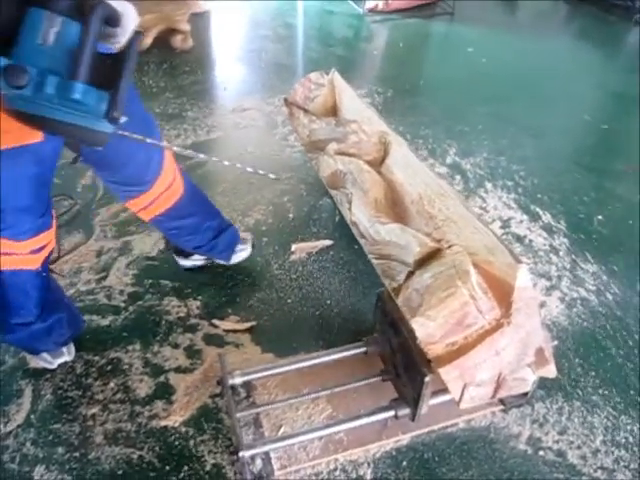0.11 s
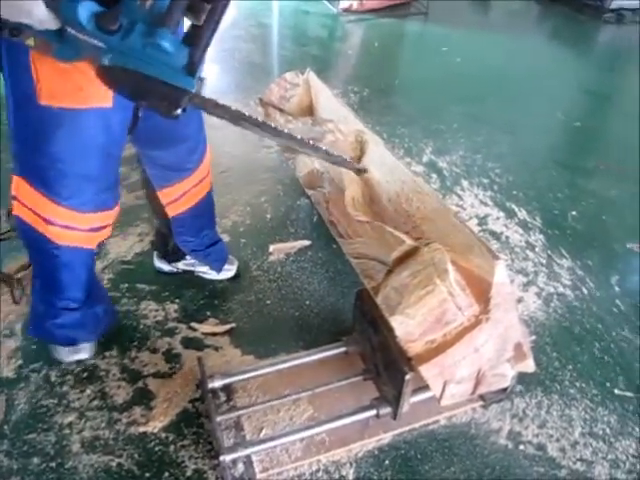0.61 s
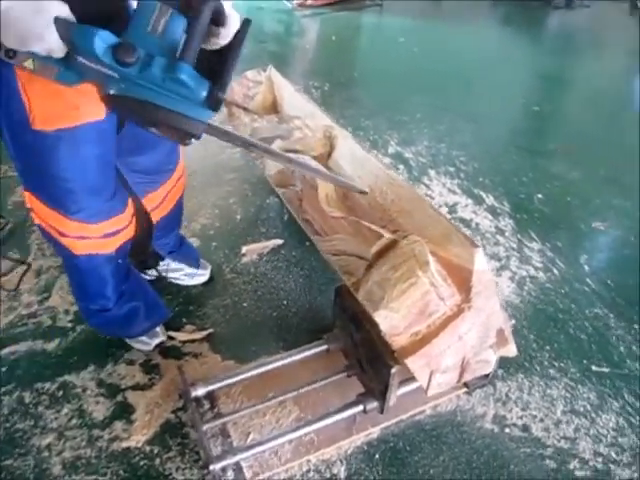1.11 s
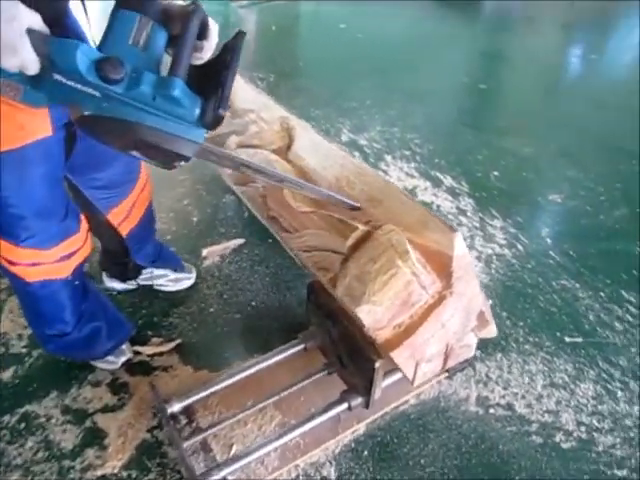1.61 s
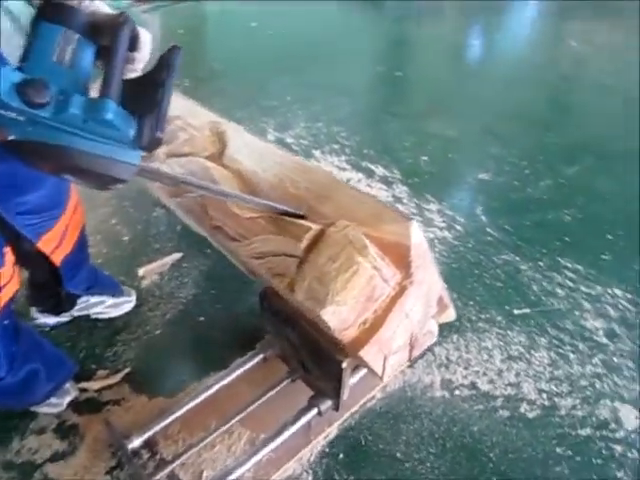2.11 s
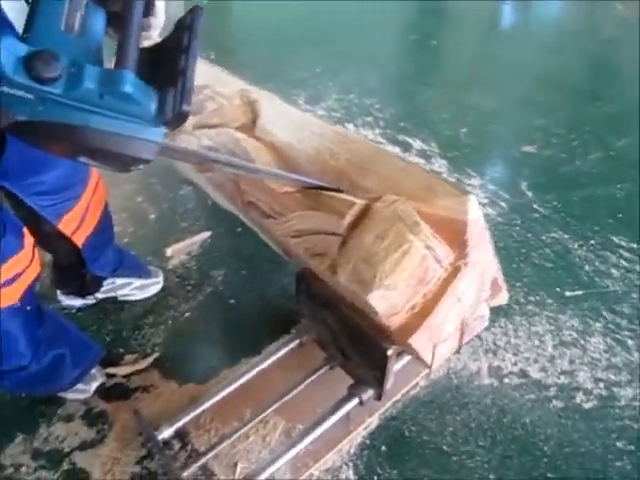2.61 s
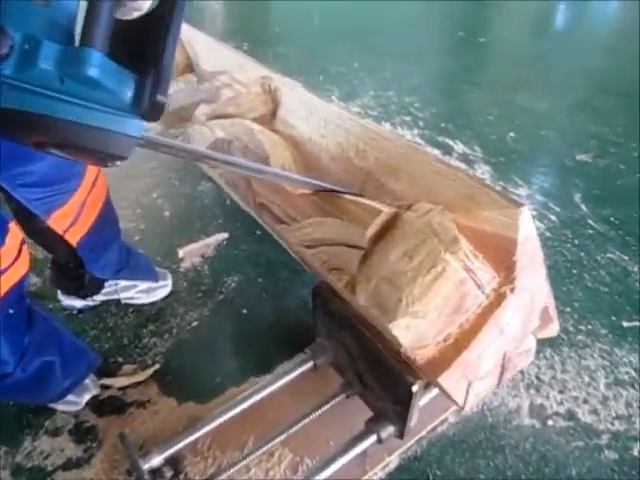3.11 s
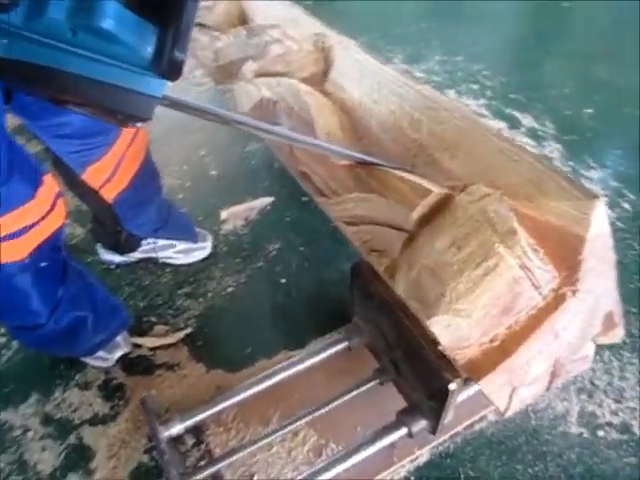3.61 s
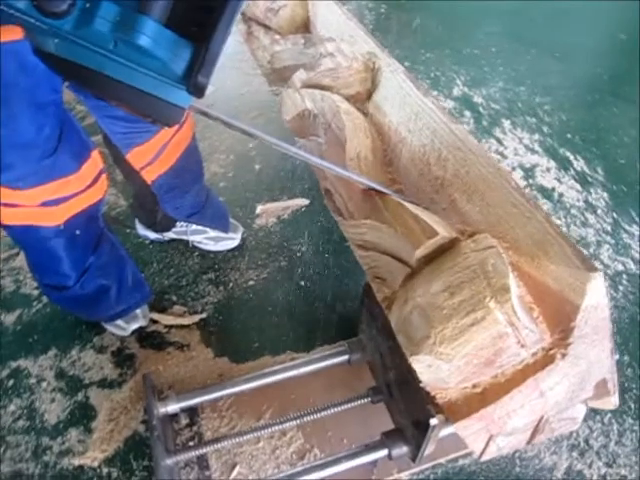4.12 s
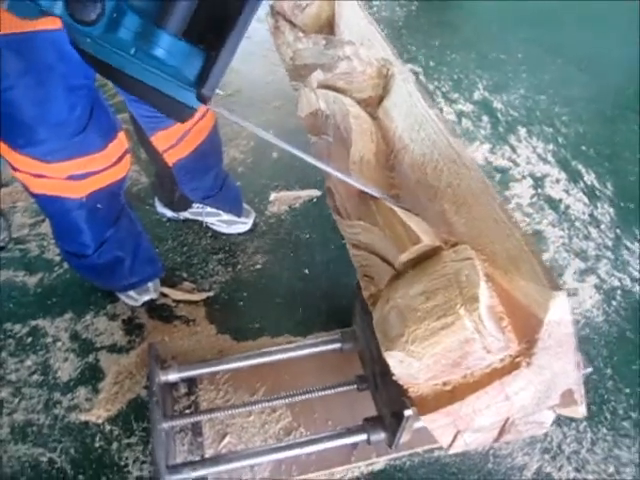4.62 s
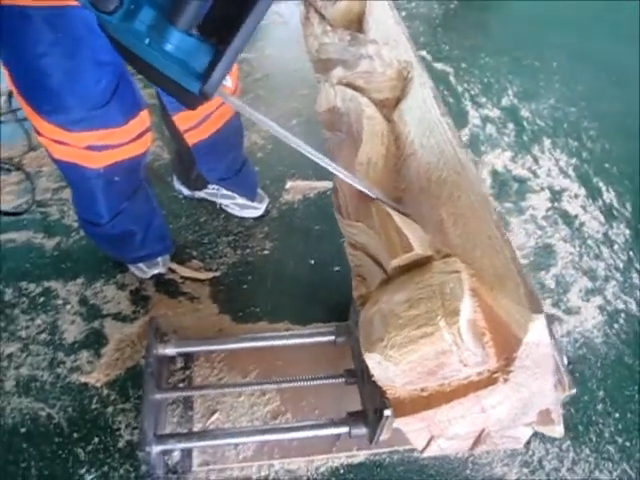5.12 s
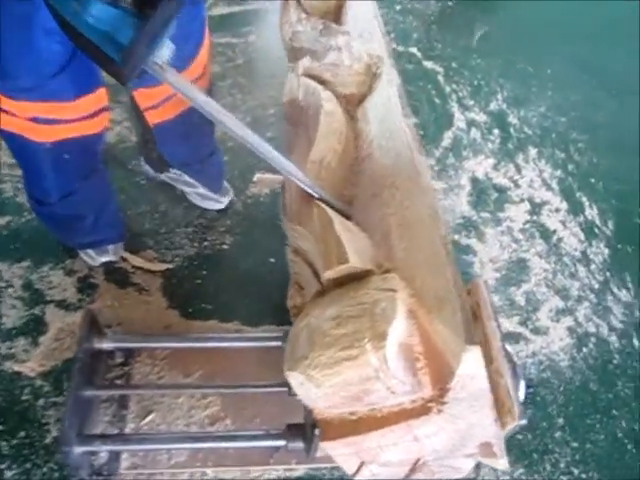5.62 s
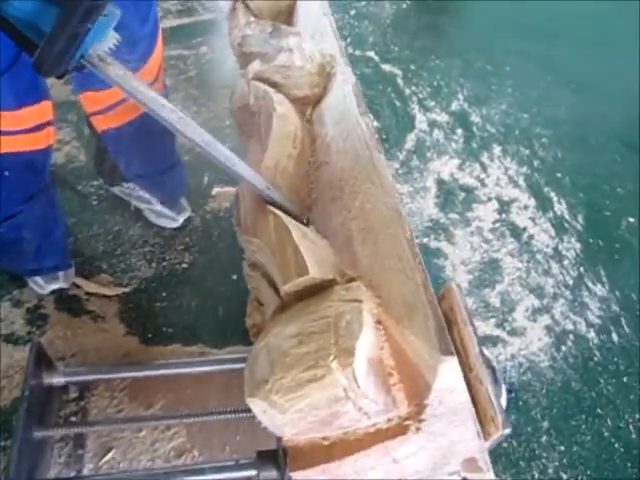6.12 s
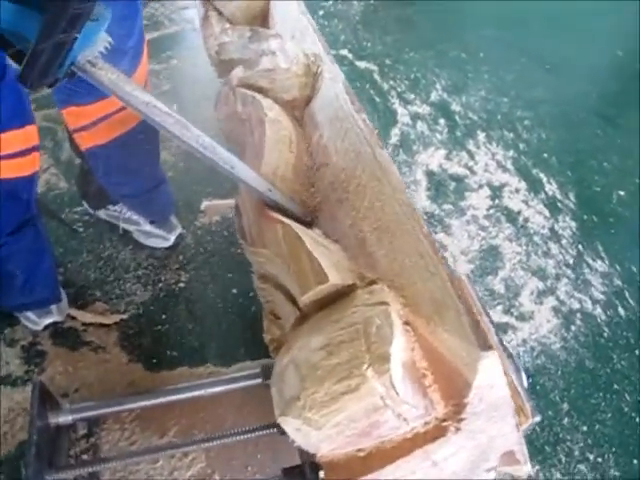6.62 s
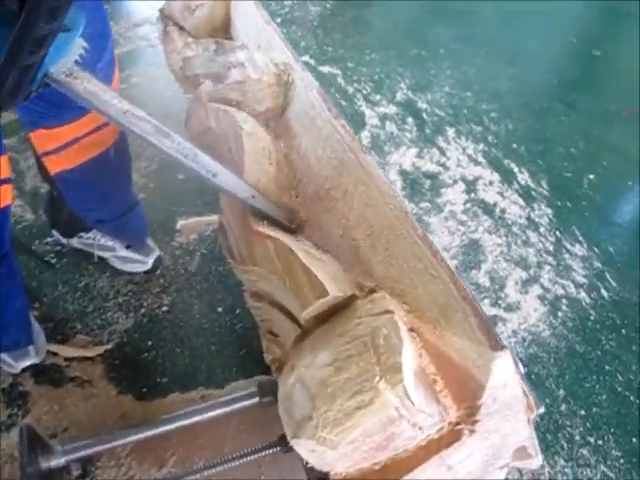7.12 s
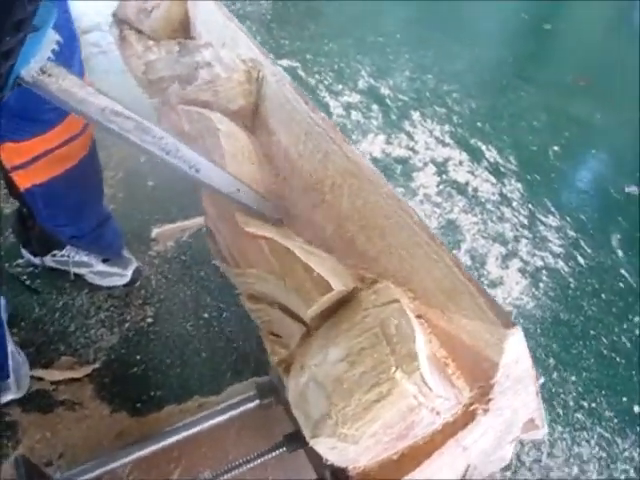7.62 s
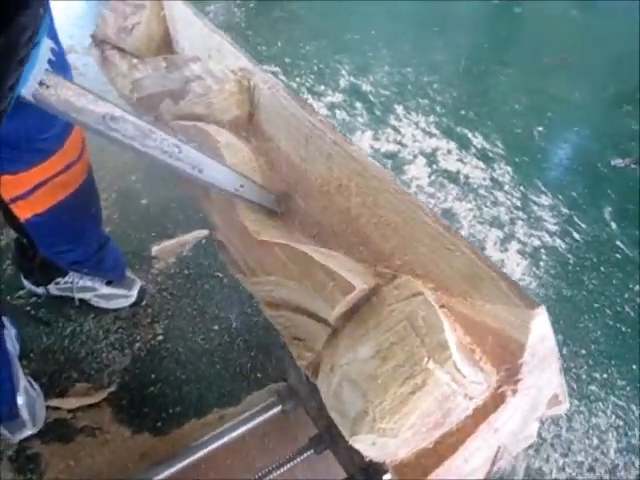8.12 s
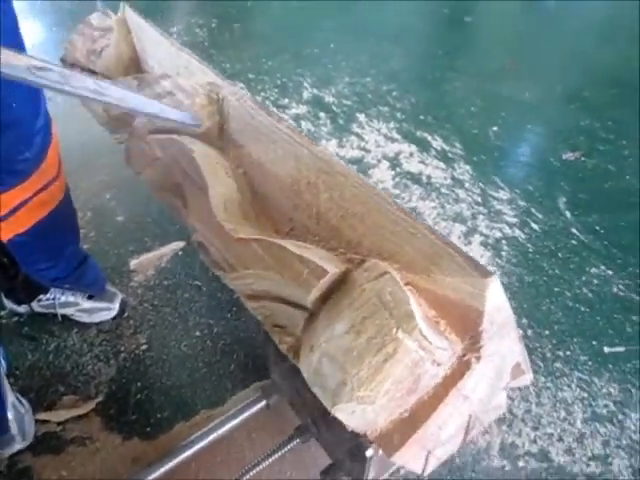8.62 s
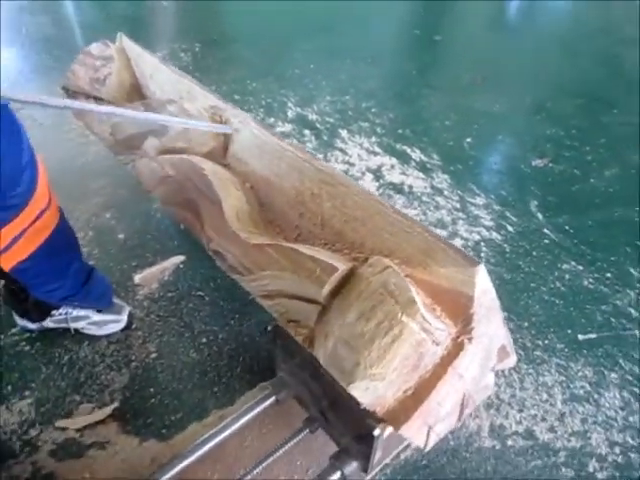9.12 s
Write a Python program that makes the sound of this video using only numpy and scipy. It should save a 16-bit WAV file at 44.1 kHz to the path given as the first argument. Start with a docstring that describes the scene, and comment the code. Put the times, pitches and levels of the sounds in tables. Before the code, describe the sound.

In a large hard-floored workshop, a second electric saw whines some way off over bright machine hiss and thin whistles. About a second in, a near electric chainsaw snaps on with a harsh burst, spins up and carves a log, whining, rattling and squealing. The far saw dies away first; finally the near one runs down and the background rises. One microphone, centered, with automatic level.

```python
"""A second electric saw whines some way off in a large hard-floored workshop, over a machine's hiss and whistles.
Then the near chainsaw starts with a bright, harsh burst, carves a log and runs down; the far one is let go first.
Saw tones are sines geared to chain and shaft; rattle, hisses, squeals and whistles are shaped noise.
One microphone hears it all; its gain control lifts the background whenever the near saw is quiet."""
import sys
import numpy as np
from scipy import signal
from scipy.fft import rfft, irfft, next_fast_len
from scipy.io import wavfile

SR = 44100
rng = np.random.default_rng(int(sys.argv[2]) if len(sys.argv) > 2 else 0)


def generate_wav(signal):
    """Clip the signal to [-1, 1] and save it as 16-bit WAV at the path in sys.argv[1]."""
    frames = np.transpose(np.atleast_2d(signal))
    scaled = np.clip(frames, -1, 1) * 32767
    pcm = np.round(scaled).astype(np.int16)
    wavfile.write(sys.argv[1], SR, pcm)


def how_loud(loudness_db):
    """Turn decibels into a plain amplitude multiplier (0 dB gives 1, 20 dB gives 10)."""
    steps = np.asarray(loudness_db, float) / 20
    return 10 ** steps


N = 408366

# All levels are ahead of the gain control; spectra give the shape alone, density_db being decibels per hertz.
# Near saw, chain link rate the motor settles to as the wood holds it back: time_s, link_rate_hz
LINK_RATE = [(1, 1036), (2.3, 1034), (2.6, 1026), (3.2, 1011), (4, 992.6), (4.6, 980), (5.2, 963.6),
             (5.6, 956.4), (6.2, 955.2), (6.7, 957), (7.1, 955.5), (8, 966), (8.3, 977), (8.55, 990)]
# Near saw, strong lines that swell and fade by turns: time_s, link_db, link_octave_db, fourth_shaft_order_db
STRONG_LINES = [(1, -56, -53, -58), (1.15, -43, -50, -41.5), (1.3, -41, -40, -36), (1.45, -42, -37, -33),
                (1.7, -37.5, -41, -44), (2.2, -34.5, -48, -49), (2.8, -31, -30, -38), (3.1, -42, -41, -35),
                (3.4, -43, -46, -33.5), (3.65, -36.5, -55, -38), (4.15, -44, -41, -32.5),
                (4.35, -47, -48, -41), (4.8, -34, -39, -33.5), (5.08, -41, -50, -60), (5.25, -37, -40, -40),
                (5.7, -35, -40, -35.5), (6.2, -39, -43, -50), (6.4, -39, -55, -29.5), (6.6, -35, -44, -52),
                (6.9, -35.5, -45, -34.5), (7.3, -36.5, -39, -32), (7.42, -40, -38, -44),
                (7.6, -35, -39, -33), (7.8, -36.5, -55, -41.5), (8.2, -36.5, -36, -35.5),
                (8.4, -41, -42, -36), (8.55, -29, -42, -40), (8.7, -40, -42, -36), (8.9, -40, -52, -36),
                (9.0, -40, -53, -39), (9.1, -44, -54, -36.5), (9.26, -60, -56, -38)]
# Near saw, upper shaft orders that come out in the deeper cut: time_s, sixth_order_db, eighth_order_db
UPPER_SHAFT_LINES = [(1, -58, -50), (2.1, -47, -52), (2.6, -55, -52), (3.4, -51, -40), (4.2, -47, -42),
                     (5, -39, -50), (5.8, -36.5, -39.5), (6.5, -44, -40), (7, -45, -40), (7.4, -40, -37),
                     (8.2, -53, -39.5), (8.6, -53, -39), (8.8, -53, -56), (9.26, -64, -66)]
# Near saw, weak lines of the chain, before the weak-part level: multiple_of_link_rate, level_db
WEAK_CHAIN_LINES = [(1 / 2, -55), (3 / 4, -48), (5 / 4, -50), (3 / 2, -49), (12 / 4, -51), (16 / 4, -49)]
# Near saw, weak lines of the motor shaft, before the weak-part level: multiple_of_shaft_rate, level_db
WEAK_SHAFT_LINES = [(4 / 4, -53), (12 / 4, -48), (20 / 4, -49)]
# Near saw, spectrum of the rattle: frequency_hz, density_db
RATTLE_SPECTRUM = [(15, -71), (25, -38), (97, -38.5), (297, -26), (445, -13.5), (876, -7), (961, -3.5),
                   (1030, -6.5), (1580, -10), (1730, -10), (2000, -11), (2600, -47), (4400, -120)]
# Near saw, spectrum of the fan hiss: frequency_hz, density_db
FAN_SPECTRUM = [(530, -17), (900, -27), (978, -10), (1100, -7), (1620, -13.5), (1760, -6), (1930, -13),
                (2200, -5.5), (2860, -6), (3350, -4), (3640, -7.5), (7010, -4.5), (10200, -1.5),
                (12100, -5.5), (15600, -15.5)]
# Near saw, hump in the fan's treble that wanders as the saw is turned: time_s, centre_hz
HUMP_CENTRE = [(1, 10970), (3, 10800), (4, 10860), (5, 10000), (5.6, 8900), (6.2, 9800), (6.7, 10540),
               (7.3, 10080), (8, 10860), (8.5, 11000), (9, 10300)]
# Near saw, squeals of the binding bar and a whistle near 10 kHz that swells for a while, before the weak-part
# level: pitch_hz, resonance_width_hz, start_s, end_s, level_db
SQUEALS_AND_WHISTLE = [(2200, 110, 2.37, 3.74, -32.5), (2570, 170, 2.6, 2.82, -33), (3230, 150, 3.0, 4.6, -35.5),
                       (10000, 350, 7.25, 8.1, -35)]
# Near saw, spectrum of the switch-on burst: frequency_hz, density_db
START_SPECTRUM = [(200, -14), (500, -4), (1500, -7), (4000, 5)]
# Far saw, speed and levels: time_s, shaft_rate_hz, fourth_shaft_order_db, hiss_db
FAR_RUN = [(0, 426.5, -35.5, -24.5), (.2, 443.8, -34.5, -23.5), (.5, 452, -34.5, -23.5),
           (.7, 457, -32, -23.5), (.95, 457, -33, -23), (1.1, 454, -39, -22.5), (1.4, 455, -33.5, -22),
           (1.9, 450.5, -35, -22.5), (2.6, 449, -36.5, -24.5), (3, 441, -42, -26), (3.4, 445, -37, -26),
           (4, 434, -41, -24.5), (4.4, 437, -36.5, -24.5), (4.8, 434.5, -50, -36), (5, 433, -34, -28),
           (5.2, 435, -46, -36), (5.8, 445, -40, -29), (6.2, 450, -34.5, -27), (6.6, 453, -56, -30),
           (7, 453, -70, -33), (8.7, 453, -83, -42), (8.95, 453, -72, -52)]
# Far saw, weaker lines: multiple_of_fourth_order, level_db against the fourth order
FAR_WEAK_LINES = [(1 / 4, -19), (5 / 8, -14), (5 / 4, -12)]
# Far saw, spectrum of the hiss: frequency_hz, density_db
FAR_SPECTRUM = [(15, -71), (25, -36), (210, -37.5), (247, -27.5), (446, -26), (484, -21), (764, -14.5),
                (923, -18.5), (1110, -10.5), (1580, -12), (1760, -11), (2570, -12.5), (4400, -12),
                (11900, -8), (15600, -22)]
# Machine, hiss and whistles that come forward near the end:
# time_s, hiss_db, whistles_db against their listed level
MACHINE_RUN = [(0, -27, 2.5), (8.75, -28, -3.5), (8.95, -24.5, -1), (9.26, -23.5, 10)]
# Machine, spectrum of the hiss: frequency_hz, density_db
MACHINE_SPECTRUM = [(880, -29), (1500, -2.5), (1670, -11), (1840, -6), (2400, -3.5), (2550, -5.5),
                    (4040, -2.5), (5580, -4.5), (7930, -5.5), (9370, -2), (10300, -3), (11200, -8),
                    (15600, -23)]
# Machine, hum and whistles: pitch_hz, resonance_width_hz, listed_level_db
MACHINE_WHISTLES = [(144, 6, -73), (4604, 5, -46.5), (3960, 200, -46), (4380, 400, -43), (10090, 60, -41.5),
                    (10270, 90, -40.5)]

START_S = .965  # the near saw is switched on


def near_saw():
    """Motor and chain lines ride on rattle, fan hiss and squeals, all silent until the switch."""
    since_s = np.arange(N) / SR - START_S
    link_hz = chain_speed(since_s)
    octaves = np.log2(link_hz / 1000)  # against full speed, 1000 links per second
    weak_db = -1.4 + 10 * octaves  # level of the weak parts
    out = chain_and_shaft(link_hz, octaves, weak_db)
    out += rattle(weak_db)
    out += fan(octaves)
    out += squeals(weak_db)
    out += start_burst(since_s)
    return out * np.clip(since_s / 0.01, 0, 1)


def chain_speed(since_s):
    """The link rate climbs exponentially to its loaded value, then falls steadily once let go."""
    missing_share, spin_up_s = .49, .27
    let_go_s, run_down_hz_per_s = 8.595, 865
    settled_hz, = in_time(LINK_RATE)
    link_hz = settled_hz * (1 - missing_share * np.exp(-np.maximum(since_s, 0) / spin_up_s))
    return link_hz - run_down_hz_per_s * np.maximum(since_s + START_S - let_go_s, 0)


def chain_and_shaft(link_hz, octaves, weak_db):
    """Chain links and motor shaft are geared together; off full speed the strong lines waver and wobble more."""
    links = np.cumsum(link_hz) / SR
    shaft = links / 2.2355  # links per shaft turn
    link_db, octave_db, fourth_db = in_time(STRONG_LINES)
    sixth_db, eighth_db = in_time(UPPER_SHAFT_LINES)
    strong = [(links, link_db), (2 * links, octave_db), (4 * shaft, fourth_db),
              (6 * shaft, sixth_db), (8 * shaft, eighth_db)]
    weak = [(k * links, db) for k, db in WEAK_CHAIN_LINES]
    weak += [(k * shaft, db) for k, db in WEAK_SHAFT_LINES]
    off_speed = np.abs(octaves)
    out = 0
    for turns, db in strong:
        out = out + line(turns, db, waver_db=1.2 + 4 * off_speed, wobble_turns=.04 + .35 * off_speed)
    for turns, db in weak:
        out += line(turns, db + weak_db, waver_db=1.5, wobble_turns=.1)
    return out


def rattle(weak_db):
    """Broad rattle of the cut at a set level, with the log humming under the chain."""
    log_ring = how_loud(-30 + weak_db) * whistle(252, width_hz=14)
    return how_loud(-35) * (noise(RATTLE_SPECTRUM, slow_db=0.4, fast_db=.5) + log_ring)


def fan(octaves):
    """Fan hiss grows with speed, and the hump in its treble grows faster still."""
    hiss_db = -21.5 + 16.5 * octaves
    hump_db = -27.5 + 24 * octaves
    hiss = how_loud(hiss_db) * noise(FAN_SPECTRUM, slow_db=.3, fast_db=.4)
    return hiss + how_loud(hump_db) * treble_hump(width_hz=2700)


def treble_hump(width_hz):
    """A band of noise carried on a moving centre; rms 1."""
    centre_hz, = in_time(HUMP_CENTRE)
    lowpass = signal.butter(2, width_hz / 2, fs=SR, output="sos")
    slow = signal.sosfilt(lowpass, rng.standard_normal((2, N)))
    phase = 2 * np.pi * np.cumsum(centre_hz) / SR
    return rms_one(slow[0] * np.cos(phase) + slow[1] * np.sin(phase))


def squeals(weak_db):
    """The bar squeals while it binds, and a whistle near 10 kHz swells later: resonant noise that swells,
    flickers and fades."""
    out = 0
    for hz, width_hz, start_s, end_s, db in SQUEALS_AND_WHISTLE:
        squeal_db = span(start_s, end_s, db, rise_db_per_s=42, fall_db_per_s=25, rest_db=-49)
        flicker_db = 2.5 * drift(16.0)
        out = out + how_loud(squeal_db + weak_db + flicker_db) * whistle(hz, width_hz)
    return out


def start_burst(since_s):
    """The slack chain snaps tight as the motor takes hold: a bright, harsh burst of noise that dies away."""
    start_db, t60_s = -29, 0.85
    return how_loud(start_db - 60 * np.abs(since_s) / t60_s) * noise(START_SPECTRUM, slow_db=0, fast_db=1.5)


def far_saw():
    """The same kind of motor further off: a few shaft orders and hiss with a thin whistle in it."""
    shaft_hz, fourth_db, hiss_db = in_time(FAR_RUN)
    fourth = 4 * np.cumsum(shaft_hz) / SR
    # the second order stands out for a while
    second_db = span(3.2, 4.3, -43.5, rise_db_per_s=35, fall_db_per_s=45, rest_db=-58.5)
    out = line(fourth, fourth_db, waver_db=1.4, wobble_turns=.04)
    out += line(fourth / 2, second_db, waver_db=2.2, wobble_turns=.06)
    for k, db in FAR_WEAK_LINES:
        out += line(k * fourth, fourth_db + db, waver_db=4.0, wobble_turns=0.16)
    hiss = noise(FAR_SPECTRUM, slow_db=1.3, fast_db=0.6)
    hiss += how_loud(-14) * whistle(12030, width_hz=140)
    return out + how_loud(hiss_db) * hiss


def machine():
    """Bright hiss in the background, with a hum and a few whistles as resonant noise."""
    hiss_db, whistles_db = in_time(MACHINE_RUN)
    hiss = noise(MACHINE_SPECTRUM, slow_db=1.2, fast_db=1.5)
    whistles = sum(how_loud(db) * whistle(hz, width_hz) for hz, width_hz, db in MACHINE_WHISTLES)
    return how_loud(hiss_db) * hiss + how_loud(whistles_db) * whistles


def line(turns, level_db, waver_db, wobble_turns):
    """A sine on a running phase; level and phase waver and flutter as reflections mix with it."""
    gain = how_loud(level_db + waver_db * (0.4 * drift(9.7) + drift(9.5)))
    return np.sqrt(2) * gain * np.sin(2 * np.pi * (turns + wobble_turns * drift(6.3)))


def noise(spectrum, slow_db, fast_db):
    """Coloured noise in overlapping bands, each swelling slowly alone and flickering partly with the rest; rms 1."""
    size = next_fast_len(N)
    octave = np.log2(np.maximum(np.arange(size // 2 + 1) * SR / size, 1))
    hz, density_db = np.transpose(spectrum)
    colour_db = np.interp(octave, np.log2(hz), density_db, left=-99, right=-99)
    colour = rfft(rng.standard_normal(size)) * how_loud(colour_db)
    out, together = 0, drift(16.0)
    # bands half an octave apart
    for centre in np.arange(np.floor(np.log2(hz[0])), np.log2(hz[-1]) + .5, .5):
        share = np.cos(np.pi * np.clip(octave - centre, -.5, .5)) ** 2
        band = irfft(colour * share, size)[:N]
        flicker_db = fast_db * (together + 0.33 * drift(22.0))
        out = out + band * how_loud(slow_db * drift(1.17) + flicker_db)
    return rms_one(out)


def whistle(hz, width_hz):
    """Noise twice through one resonance of the given width; rms 1."""
    r = np.exp(-np.pi * width_hz / SR)
    x = rng.standard_normal(N)
    for _ in range(2):
        x = signal.lfilter([1, 0, -1], [1, -2 * r * np.cos(2 * np.pi * hz / SR), r * r], x)
    return rms_one(x)


def drift(corner_hz):
    """Slow chance with spread 1: noise through two equal poles, drawn every 40 samples."""
    r = np.exp(-2 * np.pi * corner_hz * 40 / SR)
    slow = signal.lfilter([1], [1, -2 * r, r * r], rng.standard_normal(N // 40 + 2002))
    slow = rms_one(slow[2000:])  # past the filter's settling
    return np.interp(np.arange(N) / 40, np.arange(len(slow)), slow)


def span(start_s, end_s, level_db, rise_db_per_s, fall_db_per_s, rest_db):
    """A level in dB that climbs to a plateau and falls back to rest."""
    s = np.arange(N) / SR
    before_db = rise_db_per_s * np.maximum(start_s - s, 0)
    after_db = fall_db_per_s * np.maximum(s - end_s, 0)
    return np.maximum(level_db - before_db - after_db, rest_db)


def in_time(rows):
    """Columns of a table as curves at every sample."""
    s, *columns = np.transpose(rows)
    return [np.interp(np.arange(N) / SR, s, c) for c in columns]


def rms_one(x):
    """Scale to rms 1."""
    return x / np.sqrt(np.mean(x ** 2) + 1e-20)


def scene():
    """One microphone feeds both channels."""
    return np.tile(near_saw() + far_saw() + machine(), (2, 1))


def roll_off(x):
    """The treble ends steeply here."""
    return signal.sosfilt(signal.butter(12, 15750, fs=SR, output="sos"), x)


def record(dry):
    """Gain control holds the level nearly steady, so the background comes up when the near saw is quiet."""
    aim_db, share, time_s = -19.4, .9, .1  # share of the departure from the aim that is taken out
    r = np.exp(-1 / (time_s * SR))
    power = dry[0] ** 2
    smooth, _ = signal.lfilter([1 - r], [1, -r], power, zi=[np.mean(power[:SR // 4])])
    gain_db = share * (aim_db - 10 * np.log10(smooth))
    return roll_off(dry * how_loud(gain_db))


dry = scene()
out = record(dry)
generate_wav(out)
```